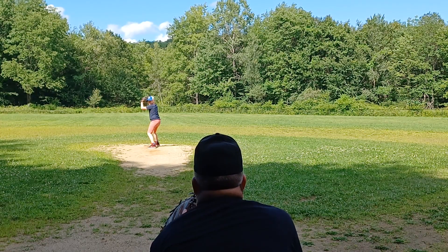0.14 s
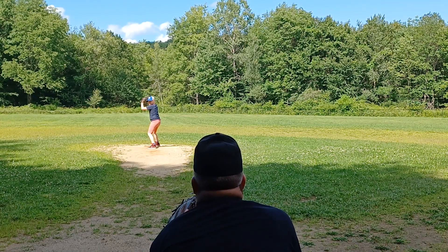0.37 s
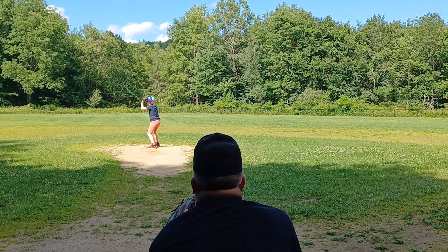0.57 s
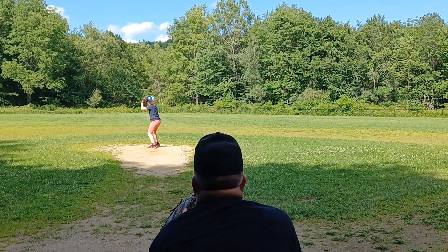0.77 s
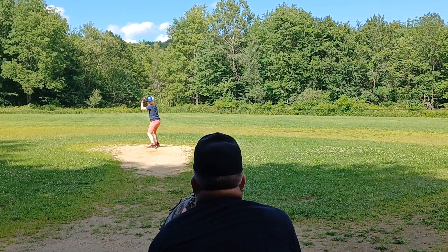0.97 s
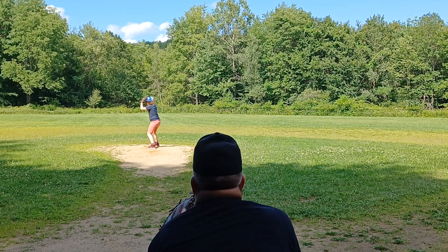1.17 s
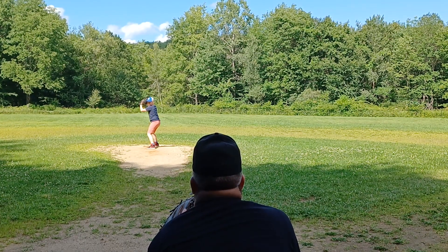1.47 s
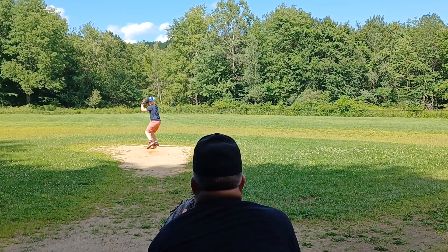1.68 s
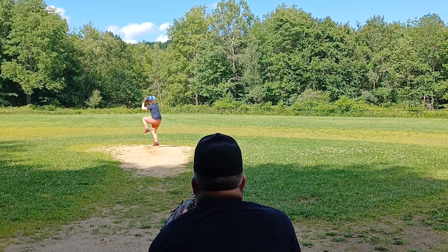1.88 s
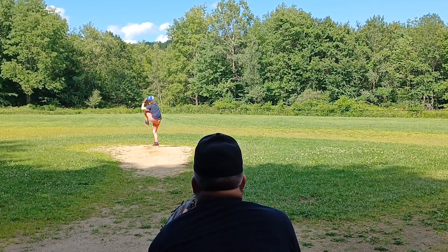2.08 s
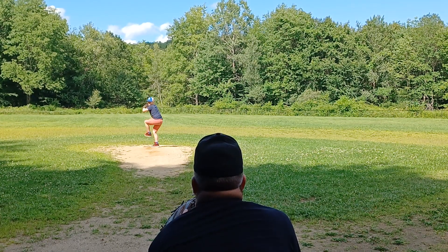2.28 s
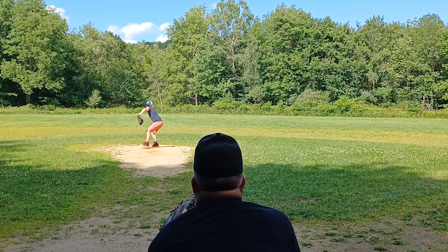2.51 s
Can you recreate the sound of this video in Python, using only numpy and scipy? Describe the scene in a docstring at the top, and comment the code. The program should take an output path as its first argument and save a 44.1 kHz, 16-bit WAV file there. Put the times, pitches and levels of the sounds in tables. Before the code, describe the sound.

A soft, crackly scuff of grit close by runs from about 0.1 to 0.35 seconds, strongest near 0.2. A quiet tree-ringed field continues throughout, with wavering, gusting low rumble from a distant road and faint leafy hiss. Very faint insect-like buzzes swell on the right near 0.8, 1.0, 1.6 and 2.3 seconds, and a tiny high tick comes at 2.4.

```python
"""Quiet grass field ringed by trees

Heard by a phone with two microphone ports. A far road drones: gusting rumble of coloured noise and a wavering
low sine. Someone near scuffs once: random grit clicks over friction noise. Faint insect-like buzzes (narrow
noise bands) and a tick (decaying sine) come from the right. Road and leaves hiss as a wash of coloured noise."""
import sys
import numpy as np
from scipy import signal
from scipy.fft import rfft, irfft
from scipy.io import wavfile
from scipy.ndimage import uniform_filter1d

SR = 44100
rng = np.random.default_rng(int(sys.argv[2]) if len(sys.argv) > 2 else 0)


def master(y):
    """Save y as 16-bit WAV."""
    cut = np.clip(np.atleast_2d(y).T, -1, 1)
    pcm = np.round(cut * 32767)  # scale
    wavfile.write(sys.argv[1], SR, pcm.astype(np.int16))


def invert_db(x):
    """Field ratio 10**(x/20) for x, a level in decibels (scalar or array-like)."""
    u = np.asarray(x, float) / 20
    return 10 ** u


N = 116865
T = np.arange(N) / SR
F = np.maximum(np.arange(N // 2 + 1) * SR / N, 1)


def over_hz(table):
    """Read a (Hz, value) table on a log-frequency axis."""
    a = np.array(table, float)
    return np.interp(np.log(F), np.log(a[:, 0]), a[:, 1])


def over_s(table, axis=1):
    """Read one column of a time table."""
    a = np.array(table, float)
    return np.interp(T, a[:, 0], a[:, axis])


def unit(x):
    """Scale to rms 1."""
    return x / np.sqrt(np.mean(x ** 2))


def walk(rate):
    """Random levels held 1 / rate s and slewed twice, rms 1."""
    hold = int(SR / rate)
    steps = np.repeat(rng.standard_normal(N // hold + 1), hold)
    return unit(uniform_filter1d(uniform_filter1d(steps, hold), hold)[:N])


def band(hz, width_hz):
    """Noise in a bell-shaped band, rms 1."""
    bell = np.exp(-((F - hz) / width_hz) ** 2 * 2)
    return unit(irfft(rfft(rng.standard_normal(N)) * bell, N))


def road():
    """Gusting rumble: coloured noise as mid and weaker side, plus a low sine in the mid."""
    # Rumble colour. Each row: frequency in Hz, density in dB per Hz (relative).
    rumble_colour = [(25, -41), (40, -16), (55, -5), (68, -5), (88, 0.5), (103, 1.5), (120, 1), (150, -6.5),
                     (175, -8), (200, -5.5), (235, -8.5), (280, -19.5), (400, -47)]
    # Each row: time in seconds, noise level in dB rms ahead of the port gains.
    gusts = [(0.0, -65), (0.72, -71.5), (0.8, -66.5), (1.1, -60), (1.12, -66), (1.15, -59), (1.19, -60),
             (1.21, -70.5), (1.4, -62), (1.48, -70.5), (1.56, -64.5), (1.62, -72.5), (1.73, -58),
             (1.77, -67), (1.94, -61), (1.98, -72), (2.04, -62.5), (2.18, -64), (2.21, -67.5), (2.37, -75),
             (2.47, -60.5), (2.5, -70), (2.56, -63), (2.65, -66)]
    side_db = -8.5
    left_db, right_db = -1.0, -1.5
    noise = rfft(rng.standard_normal((2, N)))
    rumble = irfft(noise * invert_db(over_hz(rumble_colour)), N)
    gust_gain = invert_db(over_s(gusts))
    mid = unit(rumble[0]) * gust_gain + low_rumble()
    side = unit(rumble[1]) * gust_gain * invert_db(side_db)
    return np.array([invert_db(left_db) * (mid + side), invert_db(right_db) * (mid - side)])


def low_rumble():
    """Low part of the gusting rumble: one sine of wavering pitch and changing level."""
    # Each row: time in seconds, pitch in Hz ahead of waver, level in dB rms ahead of the port gains.
    low_track = [(0.0, 94.9, -64), (0.21, 91.6, -75.5), (0.26, 88.6, -63), (0.34, 92.8, -83),
                 (0.52, 91.9, -79), (0.66, 77.6, -81.5), (0.86, 81.2, -67), (1.11, 81.4, -60),
                 (1.3, 82, -86), (1.4, 85, -65), (1.45, 84.7, -83), (1.56, 84.9, -68), (1.6, 89.3, -71.5),
                 (1.7, 88.3, -62), (2.18, 87.63, -63), (2.21, 87.1, -75), (2.29, 92.7, -85),
                 (2.39, 94.23, -87), (2.44, 94.7, -57.5), (2.49, 88.6, -66.5), (2.58, 87.05, -58.5),
                 (2.65, 87.7, -69)]
    waver = 0.04043  # rms, share of pitch
    hz = over_s(low_track) * (1 + waver * walk(14))
    phase = 2 * np.pi * np.cumsum(hz) / SR
    return np.sqrt(2) * np.sin(phase) * invert_db(over_s(low_track, axis=2))


def scuff():
    """Dense grit clicks over friction noise, coloured differently at each port."""
    # Each row: time in seconds, level in dB rms ahead of the port gains.
    scuff_level = [(.04, -95), (.09, -78.5), (.118, -74.5), (.132, -71), (.15, -71), (.185, -65),
                   (.22, -68.5), (.245, -71.5), (.27, -79.5), (.36, -83), (.42, -98)]
    # Colour at each port. Each row: frequency in Hz, density in dB per Hz (relative).
    left_colour = [(500, -5), (1000, -16), (1600, -1.5), (2100, 1.5), (2900, -4.5), (3700, -5), (4400, -29),
                   (5800, -39), (6600, -7.5), (7600, -15), (10200, -14.5), (11300, -30), (13500, -16),
                   (15500, -39)]
    right_colour = [(500, -13), (1000, 3), (1600, -7), (2100, 4), (2900, -15), (4000, -7), (5100, 0),
                    (6300, -11.5), (8500, -17.5), (10500, -11), (12500, -18.5), (14500, -19), (15500, -47)]
    # Clearest clicks. Each row: time in seconds, spectrum level in dB ahead of port colour and gain, centre in Hz.
    clear_grit = [(.123, -33, 12000), (.129, -33, 4900), (.162, -40, 9500), (0.186, -38, 9500),
                  (.222, -42, 6000)]
    grit_per_s, mean_excess_db, grit_power_share = 4200, 2.5, 0.58
    alike, left_late_s = 0.36, 0.00005  # alike: power share common to both ports

    chance = rng.random((3, N))
    hit = chance[0] < grit_per_s / SR
    grit = hit * np.sign(chance[1] - 0.5) * invert_db(-mean_excess_db * np.log(chance[2] + 1e-9))
    rub = np.sqrt(grit_power_share) * unit(grit) + np.sqrt(1 - grit_power_share) * rng.standard_normal(N)
    env = invert_db(over_s(scuff_level)) * (T > scuff_level[0][0]) * (T < scuff_level[-1][0])

    clicks = 0
    for s, db, hz in clear_grit:
        bell = np.exp(-(2 * np.log(F / hz)) ** 2)
        clicks = clicks + invert_db(db) * bell * np.exp(-2j * np.pi * F * s)

    ports = []
    for colour, gain_db, late_s in ((left_colour, 0.4, left_late_s), (right_colour, 3.0, 0)):
        low_cut = np.clip(F / 400, 0, 1) ** 2
        response = invert_db(over_hz(colour)) * low_cut * np.exp(-2j * np.pi * F * late_s)
        here = np.sqrt(alike) * rub + np.sqrt(1 - alike) * rng.standard_normal(N)
        friction = env * unit(irfft(rfft(here) * response, N))
        ports.append(invert_db(gain_db) * (friction + irfft(clicks * response, N)))
    return np.array(ports)


def buzzes():
    """Faint narrow noise bands that swell and fade, mostly on the right."""
    # Each row: start in seconds, length in seconds, centre in Hz, width in Hz,
    # right level in dB rms ahead of swell and flutter, left minus right in dB.
    buzz_rows = [(0.788, 0.059, 4900, 402, -77, -18), (0.78, .36, 4880, 1400, -72, -16.5),
                 (1.024, 0.46, 7750, 1274, -86, -8), (1.634, .22, 4160, 1802, -82.5, -9),
                 (2.271, .17, 7600, 1090, -82, -9)]
    rise_share, flutter_db = 0.27, 1.0
    out = np.zeros((2, N))
    for s, length_s, hz, width_hz, db, left_db in buzz_rows:
        u = np.clip((T - s) / length_s, 0, 1)
        swell = np.sin(np.pi / 2 * np.minimum(u / rise_share, (1 - u) / (1 - rise_share)))
        hiss = np.array([invert_db(left_db) * band(hz, width_hz), band(hz, width_hz)])
        out = out + swell * hiss * invert_db(db + flutter_db * walk(50))
    return out


def ticks():
    """Short sine rings with exponential decay, mostly on the right."""
    # Each row: start in seconds, pitch in Hz, right amplitude in dB ahead of onset and decay, t60 in seconds.
    tick_rows = [(2.385, 5270, -56, 0.0095)]
    left_db, onset_s = -18, 0.0013
    out = np.zeros((2, N))
    for s, hz, db, t60_s in tick_rows:
        u = np.maximum(T - s, 0)
        decay = np.exp(-np.log(1000) * u / t60_s)
        ring = np.sin(2 * np.pi * hz * u) * decay * np.minimum(u / onset_s, 1)
        out = out + invert_db(db + np.array([[left_db], [0]])) * ring
    return out


def wash():
    """Road and leaves: noise partly shared by the ports, left phase leading; octave bands flicker alone."""
    # Colour of the port mean. Each row: frequency in Hz, density in dB per Hz (relative).
    wash_colour = [(20,-49), (33,-25.5), (45,-9), (75,-8), (129,-6), (169,-7.5), (209,-9), (260,-8.5),
                   (330,-15), (432,-17.5), (581,-17.5), (900,-13), (1150,-16.5), (1400,-18), (1850,-19.5),
                   (2300,-26), (2900,-32), (4200,-36), (4750,-31), (5400,-28.5), (6100,-37), (6800,-38.5),
                   (7400,-32.5), (8000,-33.5), (8850,-36), (9150,-54), (10500,-46.5), (13000,-39.5),
                   (15500,-45)]
    # Each row: time in seconds, then swell in dB of bass, of middle, of treble.
    wash_swell = [(0, 0.71, 2.6, 0.27), (.3, 0.52, 1.6, 0.41), (.6, -1.4, 1.1, 0.25),
                  (.9, -0.12, 0.55, 0.32), (1.2, -0.12, 0.049, 0.23), (1.45, 0.44, 0.24, 0.14),
                  (1.7, -0.077, 0.26, 0.24), (2.0, .6, -2, -.3), (2.15, 2.1, -0.67, -0.43),
                  (2.3, 0.64, -.5, 0.34), (2.65, 0.12, -1.7, 0.34)]
    # Each row: frequency in Hz, left minus right in dB.
    port_balance = [(60, 3.5), (200, 2.5), (450, 3.5), (700, 3.5), (950, -5), (1250, 1.5), (1700, -8),
                    (2200, -4.5), (3000, -3.5), (4000, -4), (5100, -19), (6300, -3.5), (7800, -10.5),
                    (9200, -3), (15000, -0.5)]
    # Each row: frequency in Hz, power share common to both ports (0-1).
    port_alike = [(60, 0.97), (200, .85), (350, 0.69), (550, .5), (850, .4), (1250, .65), (1750, 0.2),
                  (2500, 0.066)]
    # Each row: frequency in Hz, left phase lead in radians.
    port_phase = [(60, 0.038), (340, 0.22), (600, 1.3), (1150, 2.47), (1900, 4.1)]
    mean_db, flicker_db = -69, 0.8  # mean_db: rms of the port mean ahead of swell and flicker

    shared, left_own, right_own = rfft(rng.standard_normal((3, N)))
    alike = np.clip(over_hz(port_alike), 0, 1)
    lead = over_hz(port_phase)
    tilt = invert_db(over_hz(port_balance) / 2)
    left = (np.sqrt(alike) * shared * np.exp(1j * lead) + np.sqrt(1 - alike) * left_own) * tilt
    right = (np.sqrt(alike) * shared + np.sqrt(1 - alike) * right_own) / tilt
    # undo what tilt and phase do to the port mean
    mean_gain = np.sqrt(tilt ** 2 + tilt ** -2 + 2 * alike * np.cos(lead)) / 2
    pair = np.array([left, right]) * invert_db(over_hz(wash_colour)) / mean_gain
    scale = invert_db(mean_db) / np.std(irfft(pair.mean(0), N))

    out = 0
    for octave in range(11):
        # overlapping triangles, centred on 20 Hz * 2 ** octave
        weight = np.clip(1 - np.abs(np.log2(F / 20) - octave), 0, 1)
        column = 1 if octave < 5 else 2 if octave < 8 else 3
        swell_db = over_s(wash_swell, axis=column)
        out = out + irfft(pair * weight, N) * invert_db(swell_db + flicker_db * walk(9.8))
    return out * scale


def scene():
    """All sources at the two ports."""
    return road() + scuff() + buzzes() + ticks() + wash()


def low_pass(x):
    """Removes everything above the highest recorded frequency."""
    return signal.sosfilt(signal.butter(12, 15610, fs=SR, output="sos"), x)


def record(dry):
    """The two port signals as the phone stores them."""
    return low_pass(dry)


dry = scene()
out = record(dry)
master(out)
```